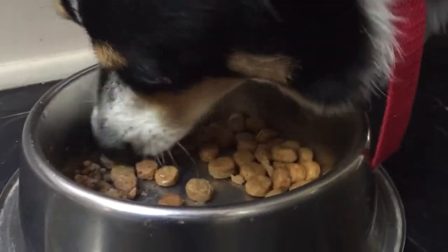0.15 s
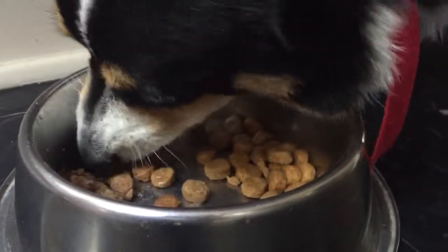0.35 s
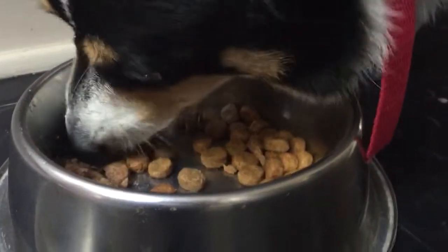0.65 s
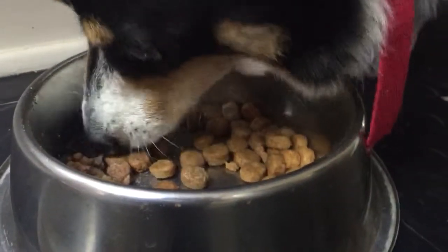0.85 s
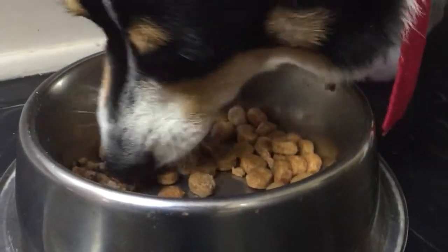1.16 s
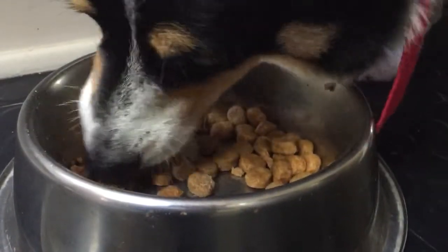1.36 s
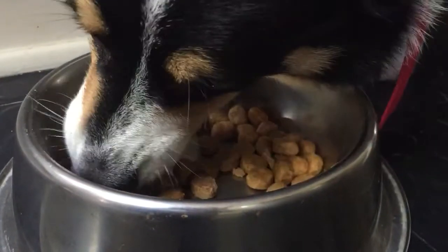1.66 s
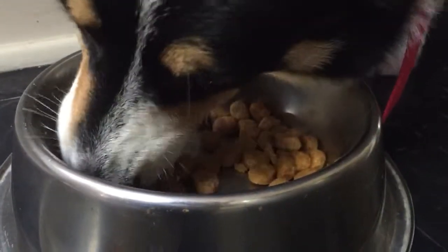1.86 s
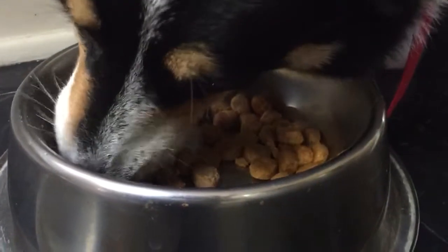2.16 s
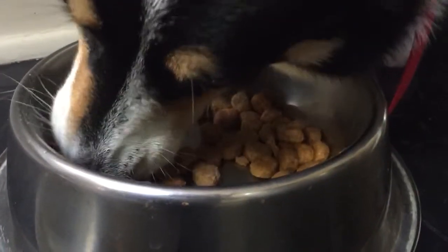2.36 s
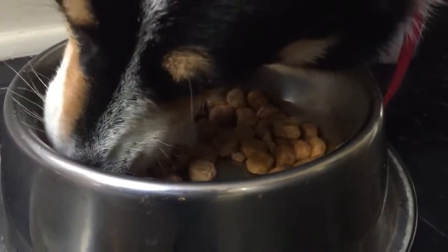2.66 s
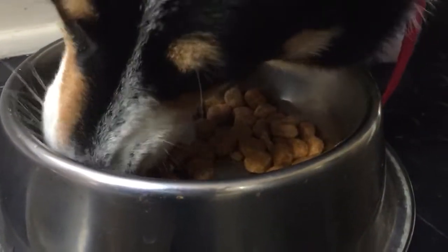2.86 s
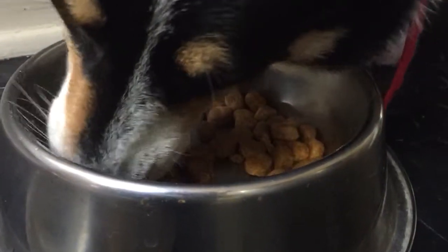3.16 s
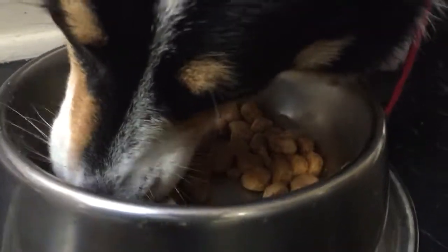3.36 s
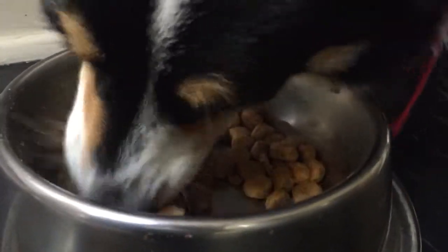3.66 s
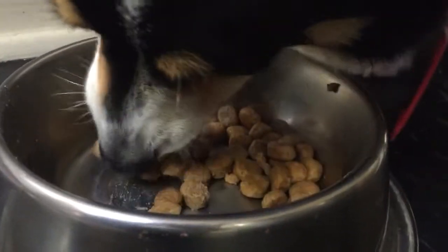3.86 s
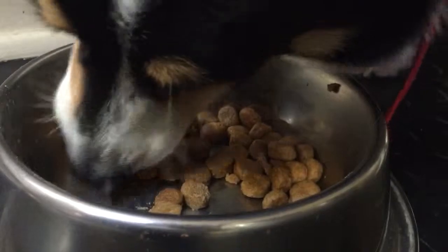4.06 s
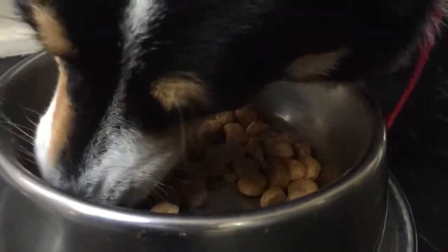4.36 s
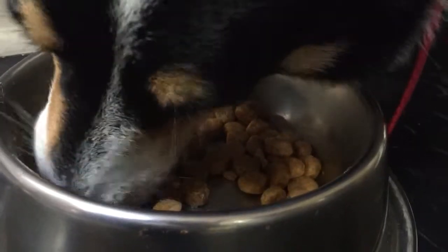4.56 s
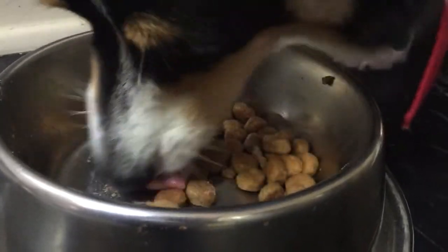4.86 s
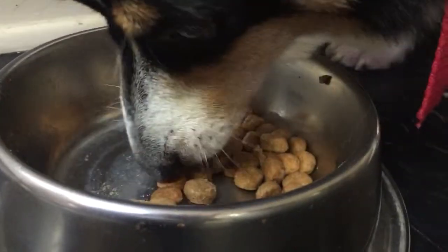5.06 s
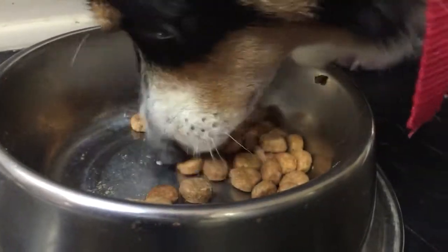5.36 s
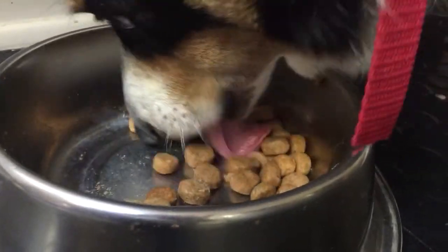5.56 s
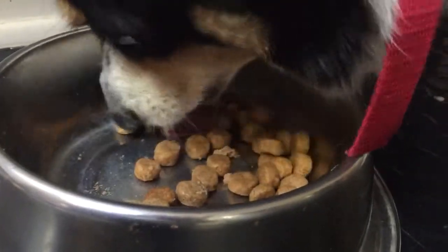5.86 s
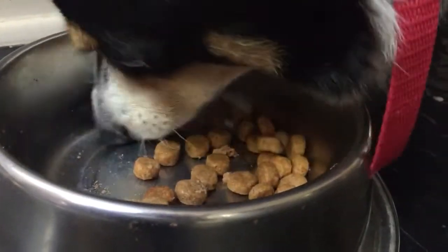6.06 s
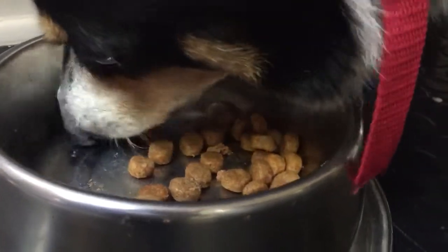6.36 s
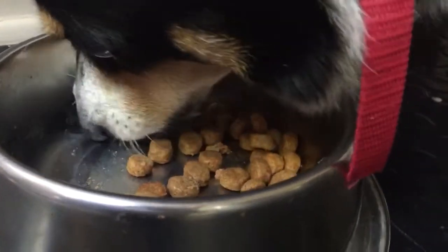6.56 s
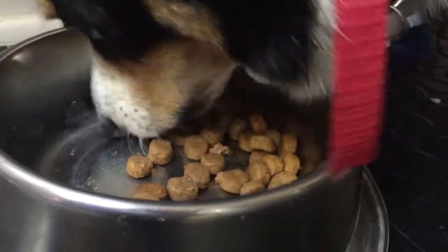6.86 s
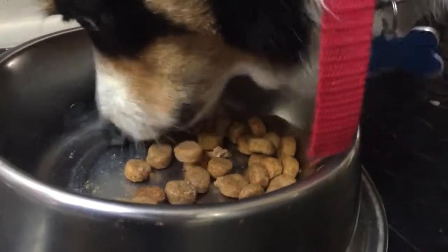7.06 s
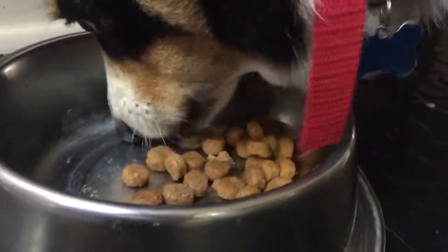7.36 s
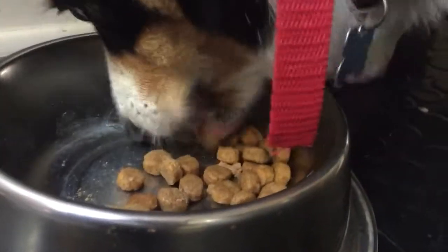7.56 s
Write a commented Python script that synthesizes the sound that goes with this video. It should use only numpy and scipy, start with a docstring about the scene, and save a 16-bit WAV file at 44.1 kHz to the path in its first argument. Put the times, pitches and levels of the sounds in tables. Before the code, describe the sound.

A dog eats dry kibble from a steel bowl on a kitchen floor, heard very close in a small room with faint low hum and still air. From 0 to 1.3 seconds, pellets knock and crack in uneven clusters, strongest near 0.25 and 0.9, with a faint tag clink at 0.2 and short nose puffs. From 1.4 to 3.5 it grows quieter: muffled chewing, sparse ticks, small crunches around 2.2, thin high tag clinks near 2.6 and 3.3. Around 3.6 to 4.5 the bowl is bumped softly, with tiny wet lip sounds at 3.9, snuffles, and a sharper clunk near 4.5. After a sparse lull, from 5.5 to 7.6 seconds loud rubbing, crunching and rapid hollow pellet clatter take over, peaking at 5.75, 6.27 and 6.83, with short damped steel clunks, soft thuds, tag clinks near 6.2, 6.6 and 6.9, and final knocks around 7.5.

```python
"""Dog at a steel bowl

A dog eats dry kibble from a steel bowl on a kitchen floor, close to the microphone.
Pellets knock and crack as pitched sweeps and noise bursts; rubbing strokes and crumbs are shaped grains.
The muzzle bumps the bowl, whose steel rings in dying modes; snuffles and wet squeaks are filtered noise.
A collar tag clinks now and then on high modes; a small room, still air and a faint hum lie behind.
"""
import sys
import numpy as np
from scipy import signal
from scipy.fft import rfft, irfft
from scipy.io import wavfile
from scipy.ndimage import uniform_filter1d

SR = 44100
rng = np.random.default_rng(int(sys.argv[2]) if len(sys.argv) > 2 else 0)


def transcribe(signal):
    """Save signal, clipped to [-1, 1], as a 16-bit WAV file at the path in sys.argv[1]."""
    frames = np.atleast_2d(signal).T
    limited = np.clip(frames, -1, 1)
    pcm = np.round(limited * 32767).astype(np.int16)
    wavfile.write(sys.argv[1], SR, pcm)


N = 339570

# All levels in the tables are relative; the sources set their own gain on top.
# still air: [f/Hz, level/dB per Hz]
AIR_SPECTRUM = [(20, -24), (60, 13.5), (150, 17.5), (400, -37), (1000, -100), (2500, -6), (8000, -15),
                (16000, -19)]
# decay of the small room: [f/Hz, t60/s]
ROOM_DECAY = [(200, 0.59), (530, 0.12), (1400, 0.21), (3700, 0.12), (10000, 0.19)]
# clinks of the collar tag: [t/s, ring level/dB, clash level/dB]
TAG_CLINKS = [(0.2084, -20, -42.5), (0.557, -56, -49), (1.285, -42, -49.5), (2.5771, -34.5, -31),
              (3.2382, -33, -32.5), (3.2938, -33, -36.5), (6.238, -52, -37), (6.579, -27, -35),
              (6.919, -30.5, -35)]
# modes of the tag: [f/Hz, level/dB, t60/s]
TAG_MODES = [(3340, -31, .3), (5055, -25, .25), (6440, -15, .12), (10270, -17, .2), (15060, -17, .16)]
# noise of the tag on steel: [f/Hz, level/dB per Hz]
CLASH_SPECTRUM = [(500, -23), (1400, 13), (2300, -14), (3800, -7), (6400, 17.5), (9000, -0.5), (14500, 1),
                  (16000, 6.5)]
# squeaks and plops of wet lips: [t of the middle/s, half length/s, f/Hz, level/dB]
LIP_SQUEAKS = [(3.9, 0.0046, 2060, -39), (3.931, 0.0066, 1660, -51.5), (4.023, 0.0045, 460, -44.5)]
# snuffles: [t of the peak/s, rise/s, fall/s, level/dB, treble tilt/dB per octave, hollow resonance f/Hz]
NOSE_PUFFS = [(0.274, 0.0076, 0.04, -37, 7, 1490), (0.639, 0.0048, 0.017, -36, -5, 6140),
              (3.364, 0.032, 0.084, -34.5, 4.5, 1490), (4.275, 0.05, 0.047, -47, -0.5, 3150),
              (4.474, 0.049, 0.063, -37, 1.5, 1940), (7.02, 0.028, 0.045, -41.5, 5.5, 1510),
              (7.328, 0.021, 0.024, -35.5, 7, 740)]
# breath at the nose: [f/Hz, level/dB per Hz]
NOSE_SPECTRUM = [(100, -7), (400, 11), (750, 2), (1150, -4.5), (1520, -1.5), (2600, -20), (3500, -13),
                 (6200, -10), (10000, -11), (16000, -16)]
# modes of the steel bowl before any damping: [f/Hz, level/dB, t60/s]
BOWL_MODES = [(226, -9, .15), (398, -13, .11), (606, 3, .15), (720, -7, .06), (940, -7, .09),
              (1114, -10, .12), (1270, -7, .08), (1464, -1, .12), (1534, -3, .14), (1675, -9, .16),
              (2110, -28, .35), (3420, -25, .18), (4730, -27, .16), (5185, -25, .12), (5880, -24, .1),
              (6845, -25, .12)]
# muzzle against bowl: [t/s, steel level/dB, floor thud level/dB, f to which the thud sinks/Hz]
MUZZLE_BUMPS = [(1.233, -42.5, -40, 185), (3.583, -34, -41, 156), (3.692, -47, -41, 154),
                (3.887, -58, -39.5, 160.4), (4.323, -35.5, -43.5, 143), (4.468, -29.5, -29.5, 232.7),
                (5.821, -28, -49, 220), (6.341, -24.5, -38, 151), (6.596, -44.5, -43, 172),
                (6.701, -21, -39.5, 140), (6.842, -22.5, -32.5, 168), (6.889, -26, -37, 109),
                (7.02, -41, -37, 130), (7.092, -32.5, -40, 172), (7.499, -27.5, -52, 304),
                (7.598, -30.5, -40.5, 106)]
# low rumble of the nudged bowl: [f/Hz, level/dB per Hz]
NUDGE_SPECTRUM = [(40, -45), (85, 3.5), (230, -8.5), (380, -4.5), (700, -60), (2000, -49)]
# rubbing pellets, also used for fur and scuffs: [f/Hz, level/dB per Hz]
RUSTLE_SPECTRUM = [(200, -10.5), (450, 9), (650, 12.5), (950, -8.5), (1550, 7.5), (2300, -1.5), (4000, -57),
                   (9000, -50)]
# strokes of jaw and tongue through the food: [t of the start/s, length/s, rustle level/dB, wet crackle level/dB]
JAW_STROKES = [(0.048, 0.037, -47, -65.5), (0.122, 0.12, -52, -62.5), (0.332, 0.2, -53, -55.5),
               (0.616, 0.093, -50.5, -58.5), (0.791, 0.13, -50, -60.5), (1.011, 0.021, -52.5, -57),
               (1.121, .12, -53, -66), (1.425, 0.071, -60.5, -78), (1.601, 0.1, -63.5, -66),
               (1.755, 0.091, -58.5, -72), (1.918, .12, -63, -65.5), (2.166, 0.065, -54.5, -61.5),
               (2.288, 0.076, -62, -62.5), (2.456, 0.053, -56, -58.5), (2.651, .042, -47, -51.5),
               (2.727, 0.17, -68, -74), (2.973, .11, -67, -80), (3.63, .09, -58, -59.5),
               (3.762, 0.085, -47.5, -58.5), (4.91, 0.074, -58.5, -62), (5.06, 0.1, -53.5, -71),
               (5.291, 0.052, -49.5, -61.5), (5.44, 0.1, -50.5, -60.5), (5.545, 0.088, -36.5, -46.5),
               (5.711, 0.12, -36, -43), (5.886, 0.1, -38.5, -48), (6.022, 0.16, -44.5, -57),
               (6.265, 0.097, -46.5, -48.5), (6.4, .14, -49, -61), (6.649, 0.11, -44, -59),
               (6.817, 0.14, -41.5, -51), (7.055, 0.1, -53, -57.5), (7.408, 0.14, -44, -56),
               (7.59, 0.093, -45, -49)]
# pitch of the cracks, lower while chewing in the mouth, higher on open steel: [t/s, f/Hz]
CRACK_PITCH_TRACK = [(.4, 4930), (1.15, 4210), (1.65, 2685), (2.17, 4260), (2.3, 3030), (2.7, 2800),
                     (3.8, 3990), (5.5, 4450), (6.0, 5160), (6.7, 4765), (7.2, 3690), (7.6, 4180)]
# pellets that stand out: [t/s, knock level/dB, nominal knock f/Hz, crack level/dB]
LOUD_PELLETS = [(0.136, -22.5, 1020, -38), (0.1502, -20, 1190, -36.5), (0.2507, -14, 990, -22),
                (.406, -26.5, 1220, -30), (.4186, -45, 1160, -23.5), (0.4436, -20.5, 900, -30),
                (0.727, -55, 1150, -34.5), (0.807, -23, 870, -41), (0.8638, -11.5, 850, -35),
                (0.8865, -17.5, 960, -29.5), (0.9082, -16, 1220, -30), (1.047, -49, 1160, -48),
                (1.1162, -31, 1030, -29.5), (1.1304, -22.5, 800, -42), (1.1508, -26, 1000, -66),
                (1.1878, -25.5, 1030, -48), (1.2335, -24.5, 845, -34.5), (1.4843, -44, 860, -41.5),
                (1.6172, -35, 1500, -41.5), (1.7525, -27, 890, -63), (1.7941, -32.5, 750, -33),
                (1.816, -45, 1520, -37.5), (2.0529, -29.5, 1500, -53.5), (2.167, -24, 1030, -25.5),
                (2.2947, -30, 1090, -31.5), (2.3122, -20.5, 960, -26), (2.6322, -28.5, 880, -46.5),
                (3.0405, -33, 960, -71), (3.0679, -31.5, 990, -48), (3.6393, -35, 900, -58),
                (3.777, -22.5, 1460, -29.5), (3.8192, -25, 1400, -36.5), (4.1434, -37, 950, -55.5),
                (4.4596, -16, 1870, -41), (4.4721, -27, 585, -32.5), (4.6464, -25.5, 1360, -64),
                (4.9437, -35, 710, -62), (5.102, -27, 1100, -49.5), (5.1327, -32, 1050, -58),
                (5.152, -23.5, 935, -42), (5.278, -32.5, 870, -79), (5.4443, -28, 680, -69),
                (5.56, -21, 1010, -28), (5.5862, -16, 1110, -20.5), (5.739, -16.5, 760, -26),
                (5.7574, -13.5, 970, -23.5), (5.7659, -11, 674, -28), (5.7742, -35, 744, -33),
                (5.7899, -22, 734, -32.5), (5.8193, -12, 905, -23.5), (5.8808, -25, 1060, -47),
                (5.954, -16, 1040, -23), (5.969, -28, 1110, -21), (6.0395, -24, 1290, -24.5),
                (6.106, -21, 700, -53), (6.1325, -17.5, 840, -40), (6.1772, -21, 740, -41.5),
                (6.27, -5, 986, -20), (6.3151, -14, 790, -47), (6.49, -24.5, 685, -69),
                (6.5295, -20, 880, -36), (6.6603, -20.5, 1440, -22.5), (6.826, -10.5, 930, -20),
                (6.8331, -12, 880, -54), (6.8465, -11.5, 1360, -52), (7.0895, -20.5, 880, -39),
                (7.1391, -18, 840, -35), (7.1566, -18, 840, -30), (7.451, -23, 1030, -23.5),
                (7.4589, -38, 900, -25.5), (7.4766, -14.5, 880, -41), (7.498, -9.5, 730, -23.5),
                (7.587, -18, 950, -31.5), (7.6177, -17, 800, -31)]

HUM_HZ = 59.4
TAG_HZ, TAG_T60_S = 11930, .1
KNOCK_LOW_HZ, KNOCK_HIGH_HZ = 756, 1157  # nominal range of the small knocks
CRACK_SCATTER = 0.0967  # spread of the log pitch from pellet to pellet
STROKE_STEEPNESS = 4.4  # how abruptly a stroke swells and fades
LOOSE_PER_S = 28  # time slots for pellets pushed aside
LOOSE_DB, LOOSE_SPREAD_DB = 11, 3  # their level over the stroke, and how the biggest exceed that
EDGE_HZ = 15950  # top of the recorder's band


def amp(db):
    """Decibels to gain."""
    return 10 ** (np.asarray(db) / 20)


def unit(x):
    """Scales to rms 1."""
    return x / np.sqrt(np.mean(x ** 2) + 1e-20)


def read(points, hz):
    """Reads a table of (Hz, value) on a log-frequency axis."""
    f, value = np.transpose(points)
    return np.interp(np.log(hz + 1), np.log(f), value)


def add(mix, s, sound):
    """Mixes a sound in at time s; what lies before time zero or past the end is dropped."""
    start = round(s * SR)
    sound = sound[max(-start, 0):]
    part = mix[max(start, 0):][:len(sound)]
    part += sound[:len(part)]


def colour(x, points, tilt_db=0):
    """Gives x a spectrum, tilted by some dB per octave; rms 1."""
    hz = np.fft.rfftfreq(len(x), 1 / SR)
    gain = amp(read(points, hz) + tilt_db * np.log2(hz + 1))
    return unit(irfft(rfft(x) * gain, len(x)))


def hiss(points, count, tilt_db=0):
    """Noise with a given spectrum; rms 1."""
    return colour(rng.standard_normal(count), points, tilt_db)


def brittle(hz, count, width_octaves, skirt_db):
    """A spectrum that peaks at one pitch, over a wide skirt."""
    octaves = np.log2((np.fft.rfftfreq(count, 1 / SR) + 1) / hz)
    peak = np.exp(-.5 * (octaves / width_octaves) ** 2)
    return peak + amp(skirt_db) / (1 + octaves ** 4 / 6)


def focus(x, hz, width_octaves, skirt_db):
    """Favours a band around hz; rms 1."""
    return unit(irfft(rfft(x) * brittle(hz, len(x), width_octaves, skirt_db), len(x)))


def ring(modes, t):
    """The dying modes of a struck thing."""
    return sum(amp(db - 60 * t / t60) * np.sin(2 * np.pi * hz * t) for hz, db, t60 in modes)


def grains(count, per_s, spread_db):
    """Tiny contacts at random moments, a few much larger than the rest."""
    size = amp(spread_db * np.minimum(rng.exponential(1, count), 3))
    size *= rng.choice([-1, 1], count)
    return size * (rng.random(count) < per_s / SR)


def background(air_db=-66, fur_db=-72, hum_db=-60, waver=0.18):
    """Still air, the faint brushing of fur and the slightly wavering hum of an appliance."""
    t = np.arange(N) / SR
    drift = hiss([(1, -11), (4, -49.0), (12, -35), (60, -100)], N)  # slow phase noise
    hum = unit(np.sin(2 * np.pi * HUM_HZ * t + waver * drift))
    fur = focus(hiss(RUSTLE_SPECTRUM, N), hz=926, width_octaves=0.89, skirt_db=4)
    return amp(air_db) * hiss(AIR_SPECTRUM, N) + amp(fur_db) * fur + amp(hum_db) * hum


def room(x, wet_db=-12):
    """A short diffuse tail; each band dies at its own speed."""
    hz, t, z = signal.stft(rng.standard_normal(SR // 2), SR, nperseg=256)
    decay = amp(-60 * t / read(ROOM_DECAY, hz)[:, None])
    tail = signal.istft(z * decay, SR, nperseg=256)[1]
    tail *= np.arange(len(tail)) / SR > .005  # a gap after the direct sound
    return x + amp(wet_db) * signal.oaconvolve(x, tail / np.linalg.norm(tail))[:N]


def walls(x, echo_db=-7, echo_decay=0.0063):
    """Echoes inside the bowl, a fresh random pattern for every sound; echo_decay in s."""
    t = np.arange(2048) / SR
    echoes = rng.standard_normal(len(t)) * np.exp(-t / echo_decay) * (t > .0015)
    return x + amp(echo_db) * signal.oaconvolve(x, echoes / np.linalg.norm(echoes))[:len(x)]


def bowl(x, body_db=-55, treble_db=-34, touched_db=-4):
    """Contacts set the steel ringing in its modes, a little less in the first five seconds."""
    t = np.arange(16384) / SR
    treble = ring([(hz, db + treble_db, t60) for hz, db, t60 in BOWL_MODES if hz > 2000], t)
    body = ring([(hz, db + body_db, t60) for hz, db, t60 in BOWL_MODES if hz <= 2000], t)
    freedom = amp(np.interp(np.arange(N) / SR, [5.2, 5.5], [touched_db, 0]))  # freer from 5.5 s on
    return x + signal.oaconvolve(x * freedom, body + treble)[:N]


def tag(ring_db=-8, modes_db=-8, clash_db=1, clash_decay=0.0054, rim_db=-18, rim_decay=0.047):
    """The tag clashes on steel, which shimmers briefly, and rings on very high; decays in s."""
    out, t = np.zeros(N), np.arange(16384) / SR
    fade = np.exp(-t / clash_decay) + amp(rim_db) * np.exp(-t / rim_decay)
    for s, tone_db, hit_db in TAG_CLINKS:
        clash = hiss(CLASH_SPECTRUM, len(t)) * fade
        tone = ring([(TAG_HZ, tone_db + ring_db, TAG_T60_S)], t)
        # each blow lands on another spot
        struck = [(hz, db + rng.normal(0, 8.6), t60) for hz, db, t60 in TAG_MODES]
        hit = amp(clash_db) * clash + amp(modes_db) * ring(struck, t)
        add(out, s, tone + amp(hit_db) * hit)
    return out


def squeaks():
    """Air slips past wet lips with a short fuzzy pitch: narrow noise under a bell-shaped swell."""
    out, t = np.zeros(N), np.arange(-4096, 4096) / SR
    for s, half, hz, db in LIP_SQUEAKS:
        tone = focus(rng.standard_normal(len(t)), hz, width_octaves=0.091, skirt_db=-56)
        add(out, s + t[0], amp(db) * tone * np.exp(-(t / half) ** 2))
    return out


def snuffles(level_db=-1.5, flutter=0.79):
    """Short puffs from the dog's nose, fluttering over the food and hollow from the bowl around it."""
    out, t = np.zeros(N), np.arange(-8192, 8192) / SR
    for s, rise, fall, db, tilt_db, hollow_hz in NOSE_PUFFS:
        swell = np.exp(-2 * abs(t) / np.where(t < 0, rise, fall))
        swell *= 1 + flutter * unit(uniform_filter1d(rng.standard_normal(len(t)), size=130))
        breath = hiss(NOSE_SPECTRUM, len(t), tilt_db)
        puff = swell * focus(breath, hollow_hz, width_octaves=0.18, skirt_db=-3.5)
        add(out, s + t[0], amp(db + level_db) * walls(puff, echo_db=1.5, echo_decay=0.0024))
    return out


def knock(hz, t, cycles=0.81, glide=0.35):
    """A few cycles that swell, sag in pitch and die: a pellet on the damped bottom of the bowl."""
    turns = hz * t
    age = turns / cycles
    phase = turns * .88 + glide * (1 - np.exp(-turns))  # sags towards 0.88 hz
    wave = np.sin(2 * np.pi * phase) + .25 * hiss(RUSTLE_SPECTRUM, len(t))
    small = signal.butter(3, 420, "highpass", fs=SR, output="sos")  # a small source radiates little bass
    return signal.sosfilt(small, age * np.exp(1 - age) * wave)


def fidget(touch_db=-52, spread_db=3.0, nudge_db=-66, count=130):
    """All along, the muzzle lightly touches single pellets and nudges the bowl at random moments."""
    out, t = np.zeros(N), np.arange(2048) / SR
    for when, size, pitch in rng.random((count, 3)):
        touch = knock(KNOCK_LOW_HZ + (KNOCK_HIGH_HZ - KNOCK_LOW_HZ) * pitch, t)
        level_db = touch_db - spread_db * np.log(size + 0.018)
        add(out, when * N / SR, amp(level_db) * walls(touch))
    nudges = colour(grains(N, per_s=19, spread_db=1.5), NUDGE_SPECTRUM)
    return out + amp(nudge_db) * nudges


def cushion(x, corner_hz=1750, ripple_db=4):
    """The soft muzzle excites the steel only up to a corner, unevenly below it."""
    return signal.sosfilt(signal.cheby1(3, ripple_db, corner_hz, fs=SR, output="sos"), x)


def bumps(ring_db=-3, clunk_db=7, clunk_hz=750, scuff_db=-3, scuff_decay=0.017, damping_db_per_s=130,
          spot_db=3, rebound_db=-10, rebound_s=.02, thud_db=1, start_ratio=2.027, sag_s=0.011,
          thud_decay=0.017, rumble_db=-2):
    """The bowl clunks, rocks back once and rings, damped by the muzzle; its foot lands with a sinking thud."""
    out, t = np.zeros(N), np.arange(16384) / SR
    attack = 1 - np.exp(-t / 0.00067)
    for s, steel_db, floor_db, end_hz in MUZZLE_BUMPS:
        rebound_delay = rebound_s * rng.uniform(.8, 1.3)
        for delay, blow_db in [(0, steel_db), (rebound_delay, steel_db + rebound_db)]:
            struck = [(hz, db + rng.normal(0, spot_db), t60) for hz, db, t60 in BOWL_MODES]
            steel = amp(ring_db - damping_db_per_s * t) * ring(struck, t)
            steel += amp(scuff_db) * hiss(RUSTLE_SPECTRUM, len(t)) * np.exp(-t / scuff_decay)
            steel += amp(clunk_db) * walls(knock(clunk_hz, t))
            add(out, s + delay, amp(blow_db) * attack * cushion(steel))
        foot_hz = end_hz * (1 + (start_ratio - 1) * np.exp(-t / sag_s))
        foot = np.sin(2 * np.pi * np.cumsum(foot_hz) / SR)
        foot += amp(rumble_db) * hiss(NUDGE_SPECTRUM, len(t))
        add(out, s, amp(floor_db + thud_db) * attack * foot * np.exp(-t / thud_decay))
    return out


def crack_hz(s):
    """The central pitch at which pellets and crumbs crack at time s."""
    return np.interp(s, *np.transpose(CRACK_PITCH_TRACK))


def crumbs(hz, size, scatter_octaves=0.52, per_s=90, count=8):
    """Several streams of crumbs crackle, each at its own pitch around hz; rms 1."""
    pitches = hz * 2 ** (scatter_octaves * rng.standard_normal(count))
    return unit(sum(focus(grains(size, per_s=per_s, spread_db=4.5), pitch, width_octaves=0.2, skirt_db=-15)
                    for pitch in pitches))


def laps(rustle_db=0, crackle_db=-1, mouth_hz=1000, jaw_db=-38, jaw_follow=0.46, jaw_hz=205):
    """Strokes swell with rubbing pellets, coloured by the mouth, wet crumbs and soft jaw thumps."""
    out, t = np.zeros(N), np.arange(-8192, 8192) / SR
    for s, length, low_db, high_db in JAW_STROKES:
        swell = 1 / np.sqrt(1 + abs(2 * t / length) ** (2 * STROKE_STEEPNESS))
        rubbing = colour(grains(len(t), per_s=600, spread_db=7.0), RUSTLE_SPECTRUM)
        rustle = focus(rubbing, mouth_hz * rng.uniform(1.0, 1.11), width_octaves=0.5, skirt_db=-12)
        crackle = crumbs(crack_hz(s), len(t))
        jaw = focus(grains(len(t), per_s=230, spread_db=4.5), jaw_hz, width_octaves=0.6, skirt_db=-42)
        stroke = amp(low_db + rustle_db) * rustle + amp(high_db + crackle_db) * crackle
        stroke += amp(jaw_db + jaw_follow * low_db) * jaw  # the jaw follows the rustle only in part
        add(out, s + length / 2 + t[0], swell * walls(stroke))
    return out


def crack(hz, t, decay=0.0024, ping_db=-7, ping_t60=0.018, rise_s=0.00045):
    """A short brittle burst, with a few brief modes of the pellet itself; decay in s."""
    shape = brittle(hz, len(t), width_octaves=0.51, skirt_db=-15.5)
    burst = irfft(rfft(rng.standard_normal(len(t))) * shape, len(t)) * np.exp(-t / decay)
    burst /= np.sqrt(2 * np.mean(burst[t < .002] ** 2))  # level set by the first 2 ms
    modes = [(hz * ratio, ping_db, ping_t60) for ratio in rng.uniform(0.638, 1.45, size=4)]
    return (0.63 * burst + ring(modes, t)) * (1 - np.exp(-t / rise_s))


def click(s, knock_db, knock_hz, crack_db):
    """One pellet: a dull knock and a bright crack, echoing in the bowl."""
    t = np.arange(2048) / SR
    pitch = crack_hz(s) * np.exp(CRACK_SCATTER * rng.standard_normal())
    return walls(amp(knock_db) * knock(knock_hz, t) + amp(crack_db) * crack(pitch, t))


def loose_pellets(crack_db=-2, count=7):
    """Each stroke pushes up to a few pellets aside, at uneven moments, their level following the stroke."""
    out = np.zeros(N)
    for start, length, low_db, high_db in JAW_STROKES:
        for k, (when, size, pitch) in enumerate(rng.random((count, 3))):
            delay = (k + when) / LOOSE_PER_S
            over_db = LOOSE_DB - LOOSE_SPREAD_DB * np.log(size + 0.15)
            hz = KNOCK_LOW_HZ + (KNOCK_HIGH_HZ - KNOCK_LOW_HZ) * pitch
            pellet = click(start + delay, low_db + over_db, hz, high_db + over_db + crack_db)
            add(out, start + delay, (delay < length) * pellet)  # silent once the stroke is over
    return out


def pellets(knock_db=-4.5, crack_db=1):
    """The pellets that stand out, striking or cracking against teeth and steel."""
    out = np.zeros(N)
    for s, low_db, hz, high_db in LOUD_PELLETS:
        add(out, s, click(s, low_db + knock_db, hz, high_db + crack_db))
    return out


def scene():
    """Everything in and around the bowl, heard in the room, over the background."""
    in_bowl = snuffles() + fidget() + laps() + loose_pellets() + pellets()
    near = tag() + squeaks() + bumps() + bowl(in_bowl)
    return (background() + room(near))[None]


def record(dry):
    """The microphone drops the deepest bass; then the recorder's band limit."""
    thin = signal.sosfilt(signal.butter(4, 46, "highpass", fs=SR, output="sos"), dry)
    band_limit = signal.firwin(511, EDGE_HZ, window=("kaiser", 9), fs=SR)
    return signal.oaconvolve(thin, band_limit[None], "same")


dry = scene()
out = record(dry)
transcribe(out)
```